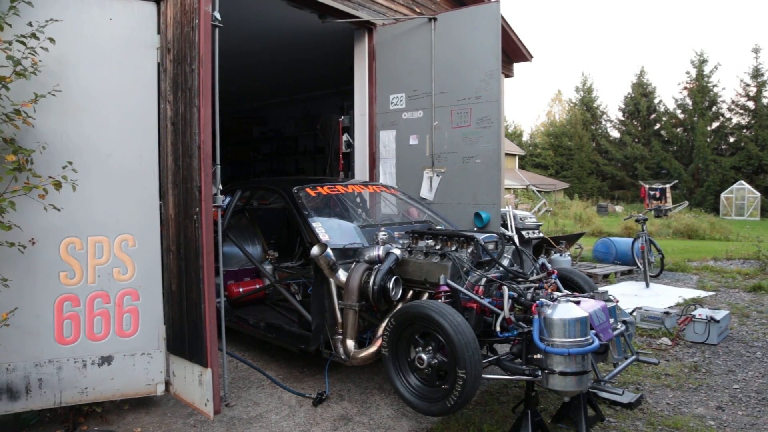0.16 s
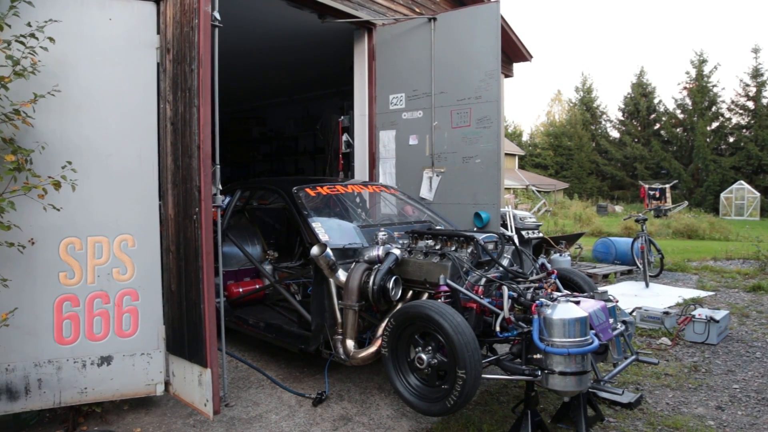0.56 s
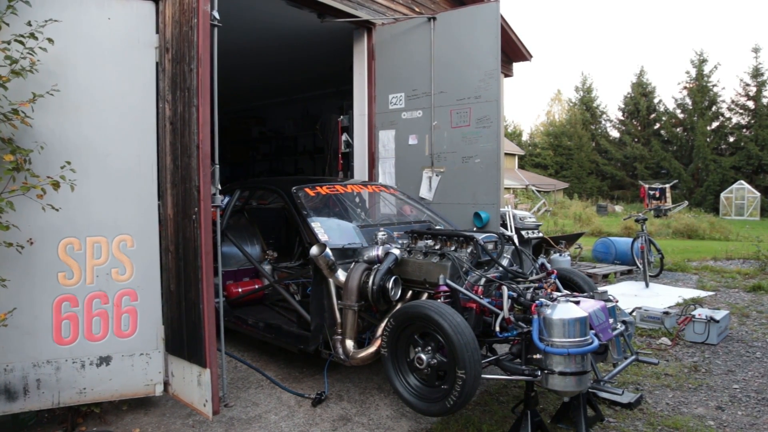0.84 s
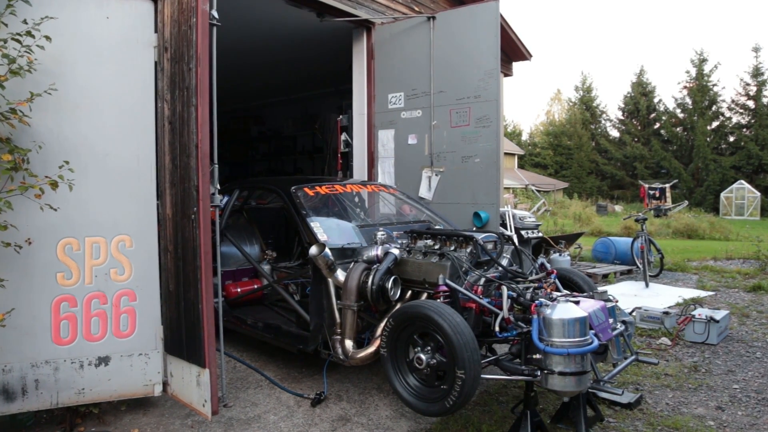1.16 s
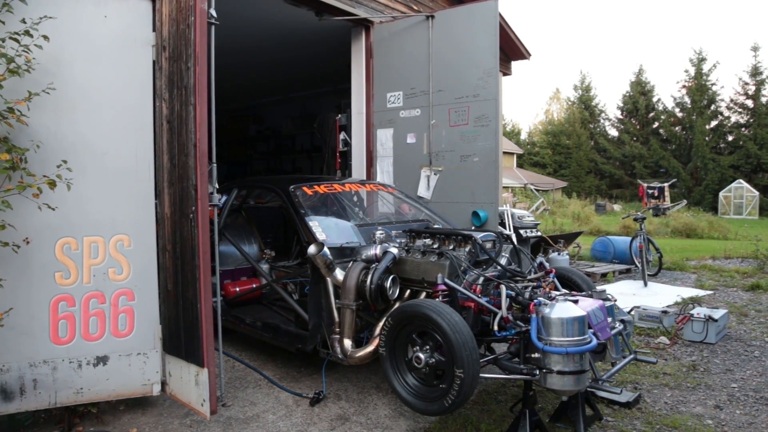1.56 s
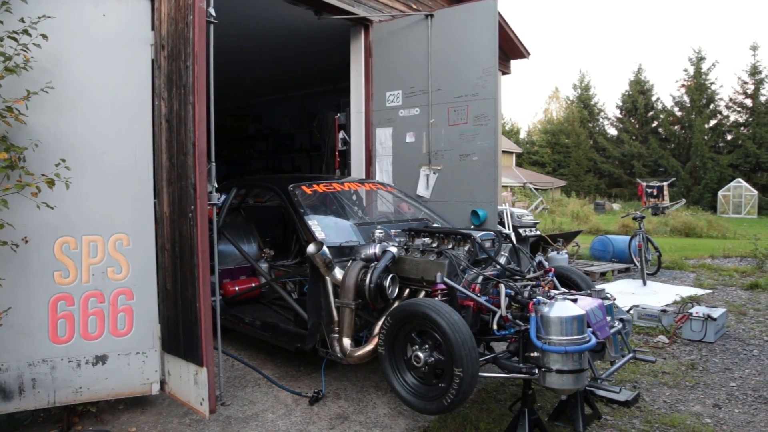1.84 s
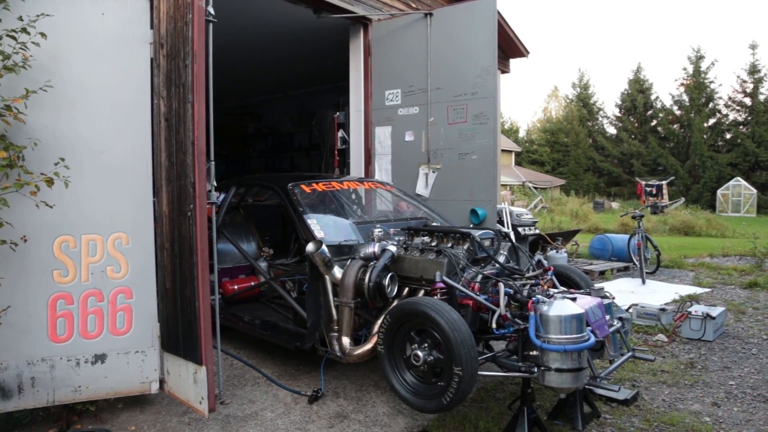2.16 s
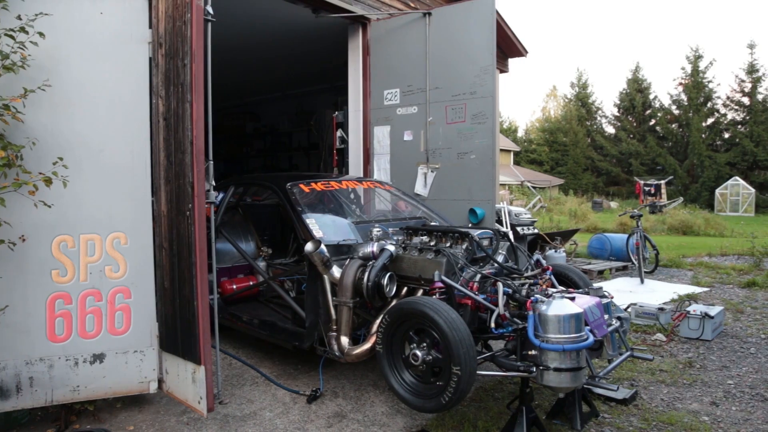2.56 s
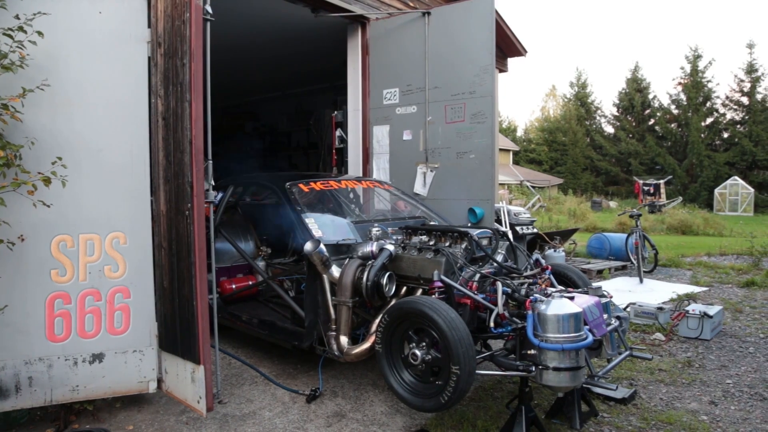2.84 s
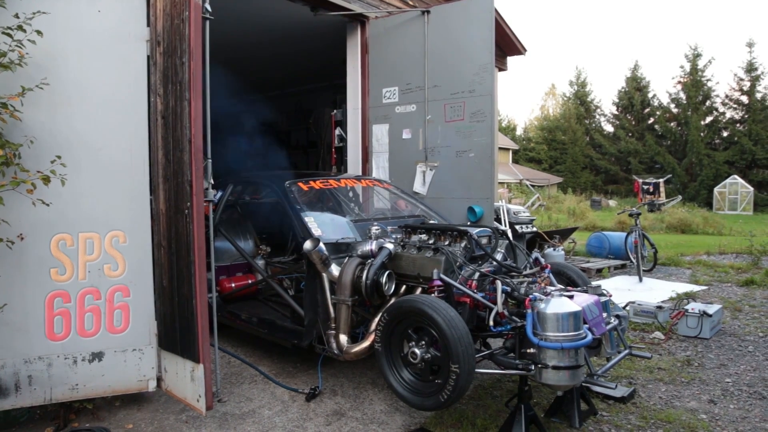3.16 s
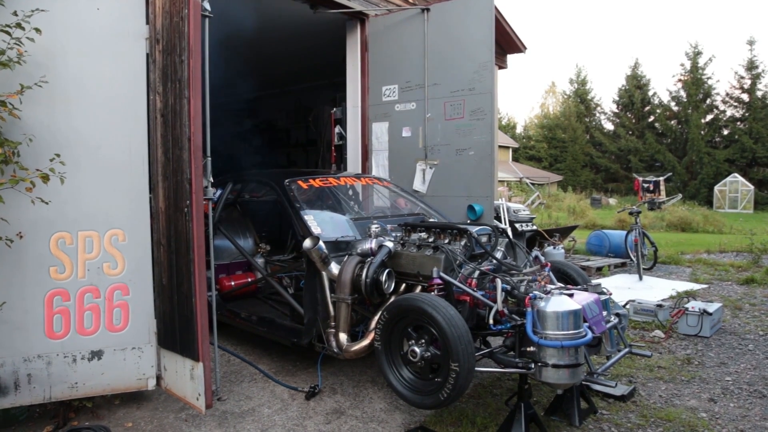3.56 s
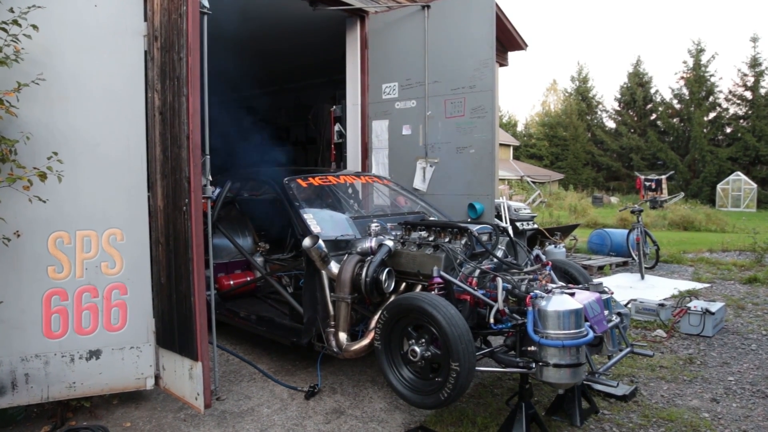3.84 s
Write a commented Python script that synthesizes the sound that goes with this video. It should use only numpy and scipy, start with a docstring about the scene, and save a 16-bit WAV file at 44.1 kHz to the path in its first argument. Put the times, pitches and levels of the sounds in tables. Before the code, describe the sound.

A V8 engine starts after a brief starter whine, sputters loudly, then revs up.

```python
"""A V8 race car cranks, catches, idles roughly with a spitting exhaust and revs in a shed doorway.
Eight uneven cylinders pulse into the pipes and flutter the engine's clatter and gas hiss.
Before it fires, the solenoid clacks and the starter gears whine against each compression.
Feet shift on gravel at the start, insects hiss faintly, and the shed gives the car a short tail."""
import sys
import numpy as np
from scipy import signal
from scipy.fft import rfft, irfft
from scipy.io import wavfile
from scipy.ndimage import uniform_filter1d

SR = 44100
rng = np.random.default_rng(int(sys.argv[2]) if len(sys.argv) > 2 else 0)


def pcm_store(signal):
    """Save signal as 16-bit PCM."""
    levels = np.round(np.clip(np.atleast_2d(signal), -1, 1) * 32767)
    wavfile.write(sys.argv[1], SR, levels.astype(np.int16).T)


N = 176400
T = np.arange(N) / SR
HZ = np.fft.rfftfreq(N, 1 / SR)

# firing rate from catch to idle to rev: t/s, f/Hz
FIRING_RATE = [(2.67, 17), (2.735, 20), (2.76, 53), (2.818, 78), (2.852, 92), (2.9, 107), (2.97, 114),
               (3.3, 116.5), (3.62, 113), (3.7, 118), (3.79, 129), (3.87, 158), (3.95, 195), (4.0, 211)]
THROTTLE_S, THROTTLE_RISE_S = 3.73, .2
def engine():
    """One firing clock drives the V8; returns its rough roar and its clean boom."""
    hz = curve(FIRING_RATE)
    firings = np.cumsum(hz * (T > FIRING_RATE[0][0])) / SR
    throttle = np.clip((T - THROTTLE_S) / THROTTLE_RISE_S, 0, 1)
    pulses, puffs = cylinders(hz, firings, throttle)
    pipes = exhaust(pulses, puffs, throttle)
    boom = engine_boom(hz, firings, throttle)
    return pipes + backfire_thumps() + clatter(puffs) + gas_hiss(puffs), boom


# cylinders in firing order: level/dB, bank (0 near, 1 far)
FIRING_ORDER = [(0, 0.0076), (0, 0.93), (2, 0.71), (-1, 0.1), (0, 0.9), (2, 0.026), (1, 0.0066), (0, 0.91)]
FAR_BANK_S, JITTER_S, UNEVEN_DB, PUFF_S = .0021, .00027, 2, .005
def cylinders(hz, firings, throttle):
    """Each firing is a sharp pulse and a dying puff of gas, a little off in time and strength."""
    at = np.flatnonzero(np.diff(np.floor(firings)))
    db, bank = np.array(FIRING_ORDER)[np.arange(len(at)) % len(FIRING_ORDER)].T
    roughness = 1 - .7 * throttle[at]  # the throttle steadies the firing
    late, strong = rng.standard_normal((len(at), 2)).T * roughness
    size = unit(amp(db + UNEVEN_DB * np.tanh(strong))) * np.sqrt(SR / hz[at])
    pulses = clicks(at / SR + FAR_BANK_S * bank + JITTER_S * late, size)
    puffs = signal.lfilter([1], [1, -np.exp(-1 / (PUFF_S * SR))], pulses)
    return pulses, puffs / np.sqrt(np.mean(puffs[at[0]:] ** 2))


# exhaust fader: t/s, level/dB
EXHAUST_FADER = [(2.73, -58), (2.76, -33), (2.808, -18.5), (2.864, -15), (2.99, -21), (3.11, -18.5),
                 (3.15, -21.5), (3.19, -17), (3.245, -19.5), (3.28, -29.5), (3.4, -21), (3.56, -21.5),
                 (3.7, -19), (3.8, -17), (3.89, -10), (4.0, -13.5)]
# pipe tone at idle and with the throttle open: f/Hz, level/dB
IDLE_EQ = [(20, -26), (42, -1), (66, -1.5), (88, -1), (125, -4.5), (165, 1.5), (205, 2), (245, -9),
           (360, -8), (410, -14), (580, -15.5), (700, -33), (2500, -42.5)]
REV_EQ = [(12, -37), (25, -2), (60, -27), (120, -4.5), (200, -3), (290, 0), (360, -9.5), (440, -8.5),
          (550, -14), (700, -22), (1100, -29), (2500, -41)]
TURBULENCE = .3
def exhaust(pulses, puffs, throttle):
    """Pulses and turbulent gas sound the pipes; the throttle crossfades idle tone to rev tone."""
    gas = TURBULENCE * puffs * noise() - pulses
    pipes = (1 - throttle) * colour(gas, IDLE_EQ) + throttle * colour(gas, REV_EQ)
    return level(EXHAUST_FADER) * pipes


# boom fader: t/s, level/dB
BOOM_FADER = [(2.74, -30.5), (2.8, -33.5), (2.87, -24), (3.0, -26), (3.3, -33), (3.6, -29), (3.8, -15),
              (3.88, -11.5), (4.0, -9.5)]
# engine tones: multiple of the eight-cylinder cycle -> level/dB
ENGINE_ORDERS = {6: -10.5, 8: 0, 11: -1, 13: -4.5, 15: -14, 21: -8, 40: -2}
def engine_boom(hz, firings, throttle):
    """Harmonics of the engine cycle, shaped by the pipe, burble less as the throttle opens."""
    cycle = 2 * np.pi * firings / len(FIRING_ORDER)
    burble_db = 2.4 * (2.5 - throttle)
    tones = 0
    for k, db in ENGINE_ORDERS.items():
        gain = amp(db + read(IDLE_EQ, k * hz / len(FIRING_ORDER)) + burble_db * drift(22.7))
        tones += gain * np.cos(k * cycle + .2 * drift(14))
    return -level(BOOM_FADER) * tones


# first lone firings: t/s, level/dB
FIRST_COUGHS = [(2.68, -5), (2.692, -4), (2.74, -2.5), (2.759, 2.5)]
# exhaust spits: t/s, level/dB
EXHAUST_SPITS = [(2.679, -26.5), (2.739, -41), (3.032, -30), (3.099, -31), (3.213, -28.5), (3.237, -31.5),
                 (3.375, -28.5), (3.445, -31.5), (3.517, -33.5), (3.586, -31), (3.631, -28.5),
                 (3.72, -32.5)]
SPIT_RISE_S, THUMP_BOOST_DB = .002, 54.5
def backfire_thumps():
    """Lone firings and spits thump the pipe; the spits' thumps ride the exhaust fader."""
    cough_s, cough_db = np.transpose(FIRST_COUGHS)
    spit_s, spit_db = np.transpose(EXHAUST_SPITS)
    coughs = colour(-clicks(cough_s, amp(cough_db)), IDLE_EQ)
    thumps = colour(-clicks(spit_s + SPIT_RISE_S, amp(spit_db + THUMP_BOOST_DB)), IDLE_EQ)
    return coughs + level(EXHAUST_FADER) * thumps


# hiss fader: t/s, level/dB
HISS_FADER = [(2.677, -40), (2.73, -42), (2.76, -28.5), (2.815, -23.5), (2.91, -25), (3.0, -35),
              (3.3, -35.5), (3.57, -39), (3.69, -31.5), (3.75, -28), (3.81, -25.5), (3.87, -23),
              (4.0, -22.5)]
# bright sizzle of the gas: f/Hz, level/dB
GAS_EQ = [(2000, -13), (4500, -6.5), (6500, -1), (8500, 0), (10500, 2.5), (12200, 0), (13800, -8.5),
          (16000, -11)]
HISS_PULSING = .16
def gas_hiss(puffs):
    """Escaping gas hisses, pulsing with each puff and flaring at each spit."""
    spit_power = sum((amp(db) * burst(s, SPIT_RISE_S, hold=.0097, fall=.025)) ** 2
                     for s, db in EXHAUST_SPITS)
    jet = patchy(noise()) * (1 + HISS_PULSING * puffs) / (1 + HISS_PULSING)
    return np.sqrt(level(HISS_FADER) ** 2 + spit_power) * colour(jet, GAS_EQ)


# clatter fader: t/s, level/dB
CLATTER_FADER = [(2.67, -55), (2.72, -38.5), (2.76, -32.5), (2.82, -27), (2.99, -29.5), (3.3, -29),
                 (3.55, -30.5), (3.8, -27), (3.89, -21.5), (4.0, -21.5)]
# body of the engine block: f/Hz, level/dB
BLOCK_EQ = [(350, -14), (600, 3), (800, -2.5), (1400, -3), (2000, 0.5), (2750, -4.5), (3700, -6),
            (4400, -8.5), (7000, -11), (12000, -26)]
# ringing engine parts: f/Hz, width/Hz, level/dB
PART_RINGS = [(552, 18, -3.5), (938, 51, -2), (1089, 23, -7.5), (1383.5, 19, -3), (1962, 38, -2.5),
              (2195, 110, 0), (3096, 35, -7), (4500, 250, -3), (6830, 130, -9)]
CLATTER_PULSING, TICKS_PER_S = .22, 700
def clatter(puffs):
    """The block knocks with the firings and ticks at random while its parts ring."""
    ticks = unit(noise() * (rng.random(N) < TICKS_PER_S / SR))
    knocking = unit(noise() * (1 + CLATTER_PULSING * puffs)) + amp(-15) * ticks
    block = amp(-2.5) * colour(knocking, BLOCK_EQ)
    return level(CLATTER_FADER) * (block + amp(-7) * ring(noise(), PART_RINGS))


# pinion tooth rate, sagging under each compression: t/s, f/Hz
TOOTH_RATE = [(2.18, 250), (2.225, 580), (2.26, 695), (2.3, 855), (2.35, 900), (2.42, 915), (2.455, 888),
              (2.49, 1035), (2.515, 935), (2.553, 1095), (2.578, 975), (2.618, 1110), (2.642, 1000)]
PITCH_JITTER = .021
def starter():
    """The solenoid throws the pinion in and the motor cranks the engine through its gears."""
    hz = curve(TOOTH_RATE)
    phase = 2 * np.pi * np.cumsum(hz * (1 + PITCH_JITTER * drift(435))) / SR
    return gear_squeal(phase) + spin_up(hz, phase) + gear_rattle() + solenoid() + gear_knocks()


# compressions loading the starter: t/s, length/s, level/dB
COMPRESSIONS = [(2.416, 0.057, -35), (2.49, .026, -31.5), (2.557, 0.023, -28), (2.621, 0.029, -27.5)]
# tooth harmonics, from the first up: level/dB
TOOTH_HARMONICS = [-13, -13.5, 0.5, -14, -17, 4.5, -3.5, -15, -7.5]
# grit of the starter gears: f/Hz, level/dB
GRIND_EQ = [(24, -11), (96, 3), (200, -9.5), (516, -5), (1480, -9.5), (3220, -8.5), (3830, -12),
            (6170, -10.5), (8770, -17), (12800, -17.5), (16000, -33)]
def gear_squeal(phase):
    """The teeth whine and grind as they push through each compression."""
    load = sum(amp(db) * arch(s, length) for s, length, db in COMPRESSIONS)
    whine = unit(sum(amp(db) * np.sin(k * phase) for k, db in enumerate(TOOTH_HARMONICS, 1)))
    flutter_db = 3.4 * drift(130)
    return load * (amp(flutter_db - 2.5) * whine + amp(-6.5) * colour(noise(), GRIND_EQ))


# spin-up fader: t/s, level/dB
SPIN_FADER = [(2.2, -50), (2.24, -43.5), (2.355, -43), (2.44, -59)]
# motor partials: multiple of the tooth rate -> level/dB
SPIN_PARTIALS = {2.35: 1.5, 5: -0.5, 6: -3, 7: -7, 9: -2}
# treble peak of the gear case: f/Hz, level/dB
CASE_EQ = [(5600, -5), (6400, 12), (7600, -9)]
SPIN_FLUTTER_DB = 4
def spin_up(hz, phase):
    """The motor sings up to speed, its partials sweeping through the gear case's peak."""
    whine = sum(amp(db + read(CASE_EQ, k * hz) + SPIN_FLUTTER_DB * drift(72)) * np.sin(k * phase)
                for k, db in SPIN_PARTIALS.items())
    return level(SPIN_FADER) * whine


# rattle fader: t/s, level/dB
RATTLE_FADER = [(2.181, -58), (2.195, -40), (2.225, -36.5), (2.37, -38.5), (2.41, -41.5), (2.66, -38),
                (2.74, -35), (2.82, -65)]
# starter housing resonances: f/Hz, width/Hz, level/dB
HOUSING_RINGS = [(92.3, 12, -15), (195, 26, -8.5), (483, 96, -2.5), (951, 25, -4.5), (1100, 16, -8.5),
                 (2065, 80, -7.5), (6840, 80, 2)]
def gear_rattle():
    """The running gears rattle and their housing rings."""
    teeth = unit(patchy(noise()) * amp(2.3 * drift(214)))
    housing = amp(-6.5) * ring(noise(), HOUSING_RINGS)
    return level(RATTLE_FADER) * (amp(-2.5) * colour(teeth, GRIND_EQ) + housing)


# plunger crack and its ringing tail: t/s, level/dB, decay/s
PLUNGER_CLACK = [(2.1803, -25.5, 0.0021), (2.183, -30, 0.0096)]
# metallic tone of the clack: f/Hz, level/dB
CLACK_EQ = [(100, -30), (330, -2), (600, -19), (1700, -9), (2600, 7), (3400, -5), (4300, -3), (5000, -10),
            (5900, -1), (7000, 0), (8500, -9), (13000, -5), (16000, -17)]
def solenoid():
    """The plunger slams home with a sharp crack and a short ring."""
    clack = sum(amp(db) * burst(s, rise=.00024, hold=.0014, fall=fall) for s, db, fall in PLUNGER_CLACK)
    return colour(noise() * clack, CLACK_EQ)


# gear knocks: t/s, f/Hz, width/Hz, level/dB, decay/s
GEAR_HITS = [(2.195, 457, 109, -35.5, 0.024), (2.196, 984, 150, -35, .012), (2.222, 1147, 45, -40.5, .04),
             (2.633, 1860, 178, -30.5, 0.012), (2.713, 1010, 710, -29.5, .0044)]
def gear_knocks():
    """Each knock in the gears rings briefly in one band."""
    return sum(amp(db) * burst(s, rise=.0038, hold=.0028, fall=fall) * ring(noise(), [(hz, width, 0)])
               for s, hz, width, db, fall in GEAR_HITS)


# gravel clicks: t/s, level/dB, brightest f/Hz
STONE_SNAPS = [(0.069, -53.5, 1400), (0.191, -53.5, 980), (1.03, -54, 500), (1.043, -50, 600),
               (1.69, -47, 1370), (1.793, -52, 1440), (1.873, -56, 1700), (1.9556, -46, 1490)]
# shoe scuffs: t/s, length/s, level/dB, brightest f/Hz
SHOE_SCUFFS = [(0, 0.26, -69, 1080), (.85, 0.48, -73, 200), (0.99, 0.13, -65.5, 408),
               (1.265, .024, -68, 600), (1.443, 0.022, -64.5, 2210), (1.673, 0.11, -60, 232),
               (1.679, 0.11, -65, 1770), (1.72, 0.41, -73, 1770)]
def gravel():
    """Stones snap and grind under a shoe."""
    def dull(x, hz):
        return colour(x, [(hz / 8, -16), (hz * .47, -1), (hz * 1.09, 0), (hz * 2.56, -14), (hz * 10, -32)])
    snaps = sum(amp(db) * dull(noise() * burst(s, rise=.0001, hold=.00023, fall=.00063), hz)
                for s, db, hz in STONE_SNAPS)
    grains = unit(noise() * amp(7 * drift(340)))
    scuffs = sum(amp(db) * arch(s, length) * dull(grains, hz) for s, length, db, hz in SHOE_SCUFFS)
    return amp(4) * snaps + scuffs


# outdoor air bed: f/Hz, level/dB
AIR_EQ = [(25, -3), (58, -2), (137, -11), (190, -5.5), (270, -7.5), (590, -12.5), (3160, -22), (9570, -9.5),
          (11300, -7), (16000, -18.5)]
INSECT_HZ, INSECT_WIDTH_HZ = 11130, 260
def meadow():
    """Still air and the thin hiss of a distant insect chorus."""
    air = amp(-67.5) * colour(noise(), AIR_EQ)
    return air + amp(-72) * ring(noise(), [(INSECT_HZ, INSECT_WIDTH_HZ, 0)])


# shed reverb time: f/Hz, t60/s
SHED_DECAY = [(100, 0.94), (1000, 0.16), (10000, 0.15)]
def shed(x):
    """Scattered reflections from the open shed blur into a tail that lasts longest in the bass."""
    n = SR // 2
    echoes = rng.standard_normal(n) * (rng.random(n) < 2000 / SR) * (T[:n] > .008)  # 8 ms pre-delay
    hz, t, bands = signal.stft(echoes, SR, nperseg=256)
    decay = amp(-60 * t / read(SHED_DECAY, hz)[:, None])
    tail = signal.istft(bands * decay, SR, nperseg=256)[1]
    return signal.fftconvolve(x, tail / np.linalg.norm(tail))[:N]


def amp(db):
    """Decibels to gain."""
    return 10 ** (np.asarray(db) / 20)


def unit(x):
    """Scales to rms 1."""
    return x / np.sqrt(np.mean(x ** 2) + 1e-20)


def curve(points):
    """Joins (t/s, value) points."""
    return np.interp(T, *np.transpose(points))


def level(points):
    """Gain from a dB fader, silent before its first point."""
    return amp(np.interp(T, *np.transpose(points), left=-140))


def read(points, hz):
    """Reads a curve on a log-frequency axis."""
    f, values = np.transpose(points)
    return np.interp(np.log(hz + 1), np.log(f + 1), values)


def noise():
    """White noise."""
    return rng.standard_normal(N)


def colour(x, points):
    """Minimum-phase EQ of unit energy."""
    log_gain = np.log(amp(read(points, abs(np.fft.fftfreq(8192, 1 / SR)))))
    taps = np.fft.ifft(np.exp(np.conj(signal.hilbert(log_gain)))).real[:4096]
    return signal.oaconvolve(x, taps / np.linalg.norm(taps))[:N]


def ring(x, rows):
    """Sum of steep resonances (f/Hz, width/Hz, level/dB), rms 1."""
    z = rfft(x)
    return unit(sum(amp(db) * unit(irfft(z / (1 + 1j * (HZ - f) / w) ** 2, N)) for f, w, db in rows))


def drift(hz):
    """Random wobble up to about hz, rms 1."""
    return unit(irfft(rfft(noise()) / (1 + (HZ / hz) ** 4), N))


def patchy(x, depth_db=3.0):
    """Turbulence: bands of the noise swell and fade at random."""
    bands = signal.stft(x, nperseg=512)[2]
    swell = uniform_filter1d(rng.standard_normal(bands.shape), size=3, axis=0)
    swell = unit(uniform_filter1d(swell, size=7, axis=1))
    return unit(signal.istft(bands * amp(depth_db * swell), nperseg=512)[1][:N])


def burst(s, rise, hold, fall):
    """Attack, hold and exponential release, in seconds."""
    return np.clip((T - s) / rise, 0, 1) * np.exp(-np.maximum(T - s - hold, 0) / fall)


def arch(s, length):
    """A swell that peaks early."""
    return abs(np.sin(np.pi * np.clip((T - s) / length, 0, 1) ** 0.5))


def clicks(times, sizes):
    """Impulses at the given times."""
    return np.bincount(np.clip(np.asarray(times) * SR, 0, N).astype(int), sizes, N + 1)[:N]


SHED_SEND_DB, WIDTH_DB = -11.5, -48.5
def scene():
    """The car in the doorway over gravel and meadow, almost mono."""
    roar, boom = engine()
    car = roar + starter()
    mid = car + boom + amp(SHED_SEND_DB) * shed(car) + gravel() + meadow()
    side = amp(WIDTH_DB) * shed(mid)
    return np.array([mid + side, mid - side])


CEILING, HIGH_CUT_HZ = .95, 15850
def record(dry):
    """Soft peak limit, then a steep high cut."""
    limited = dry / (1 + (dry / CEILING) ** 8) ** (1 / 8)
    high_cut = signal.firwin(511, HIGH_CUT_HZ, window=("kaiser", 9), fs=SR)
    return signal.oaconvolve(limited, high_cut[None], "same")


dry = scene()
out = record(dry)
pcm_store(out)
```